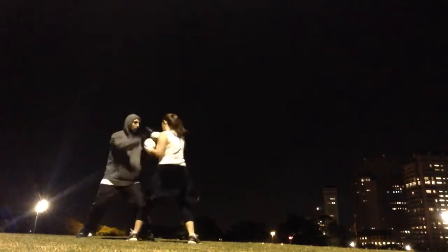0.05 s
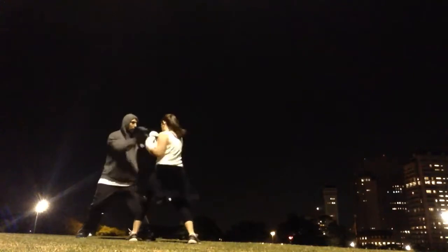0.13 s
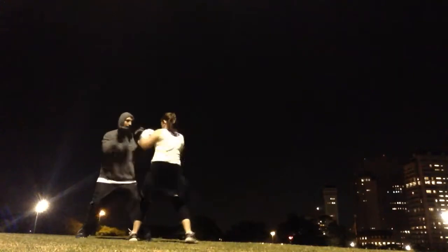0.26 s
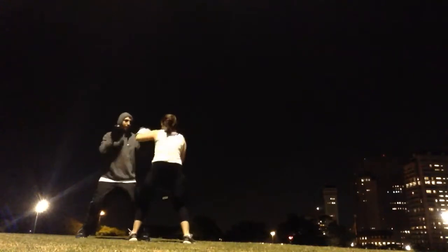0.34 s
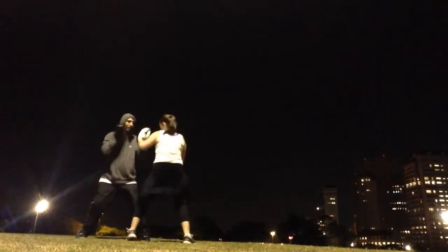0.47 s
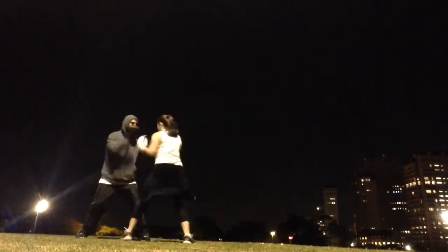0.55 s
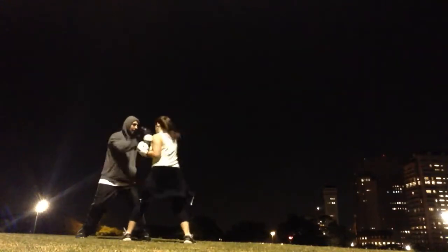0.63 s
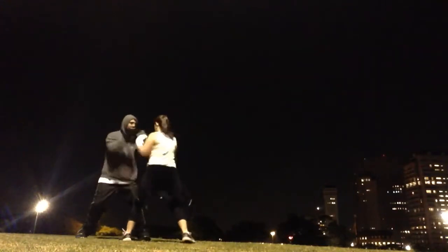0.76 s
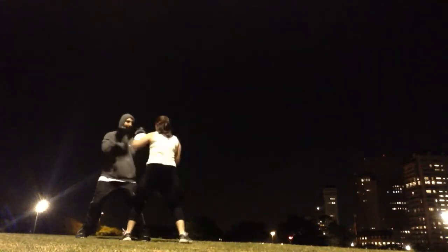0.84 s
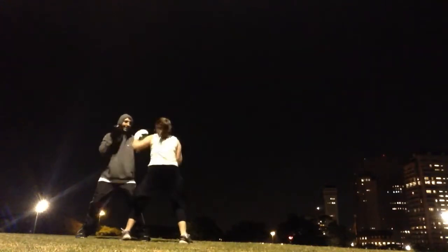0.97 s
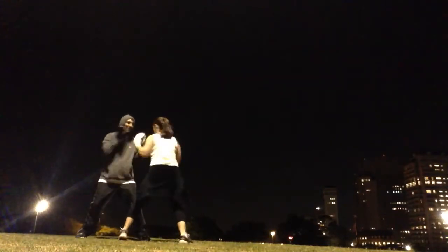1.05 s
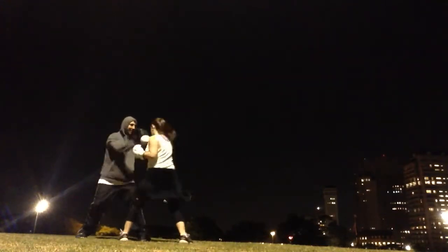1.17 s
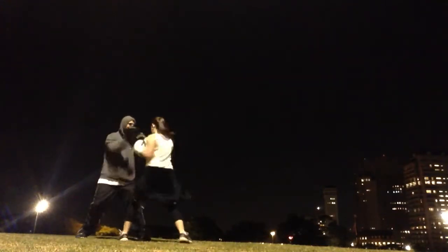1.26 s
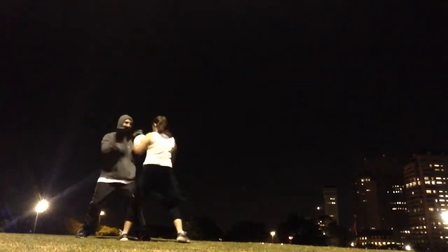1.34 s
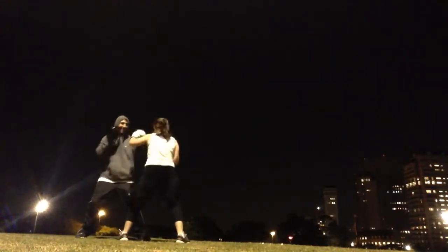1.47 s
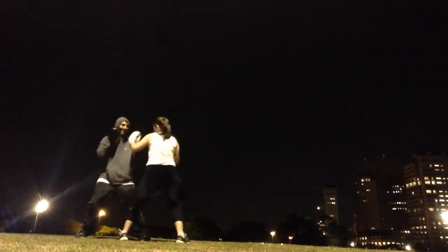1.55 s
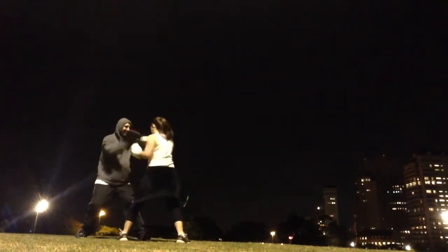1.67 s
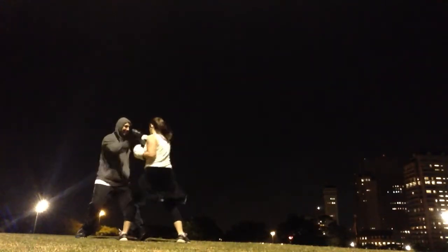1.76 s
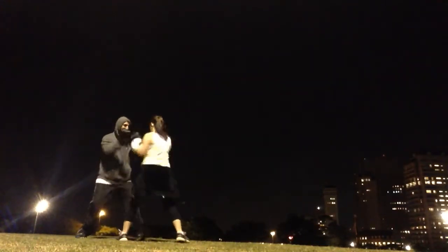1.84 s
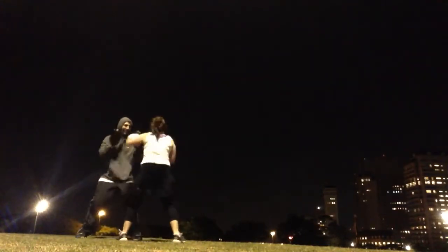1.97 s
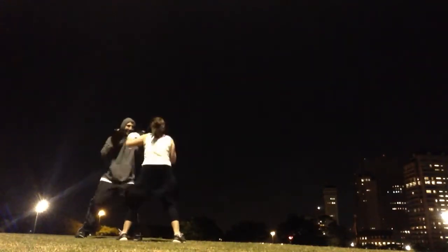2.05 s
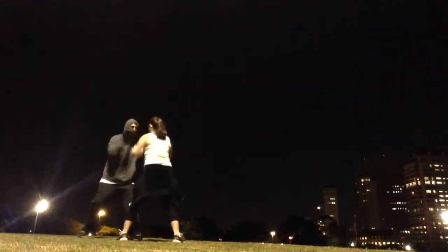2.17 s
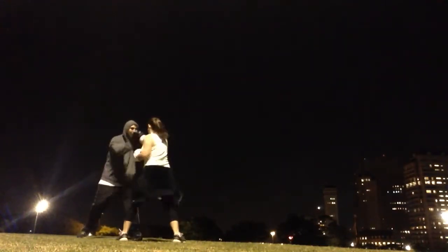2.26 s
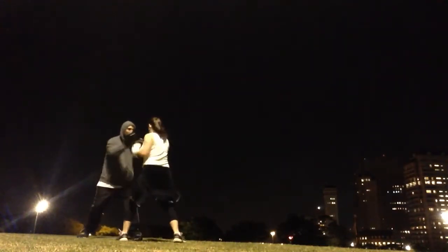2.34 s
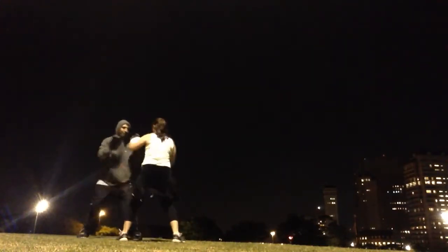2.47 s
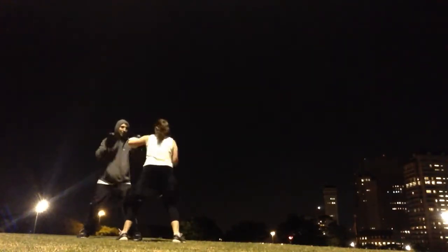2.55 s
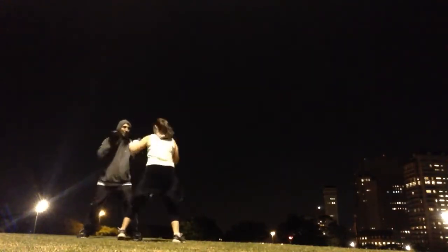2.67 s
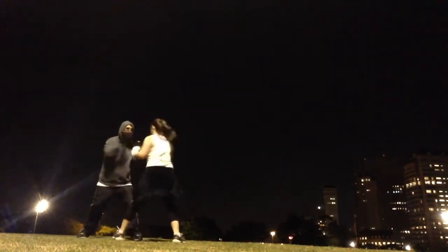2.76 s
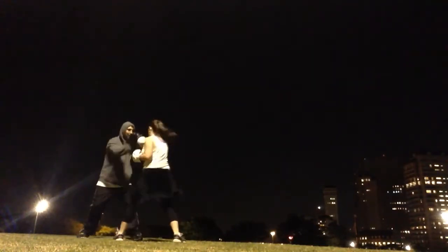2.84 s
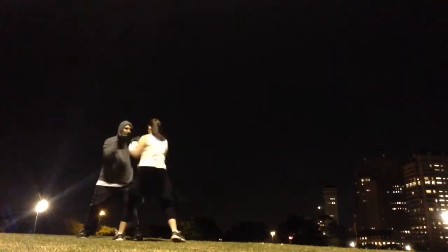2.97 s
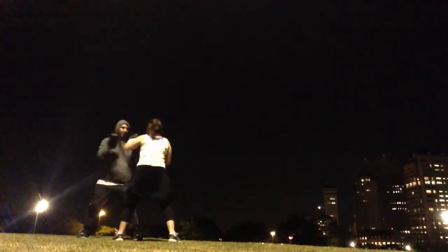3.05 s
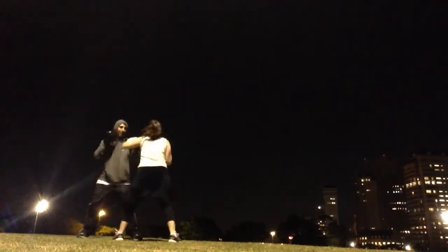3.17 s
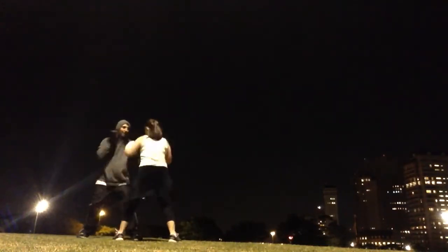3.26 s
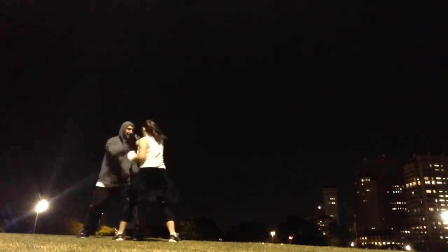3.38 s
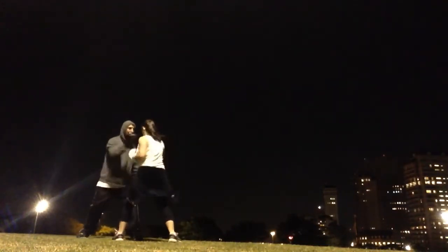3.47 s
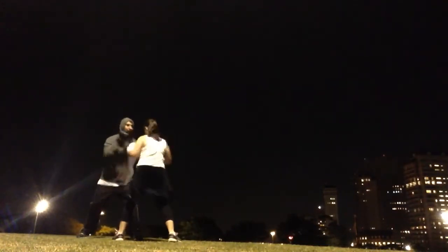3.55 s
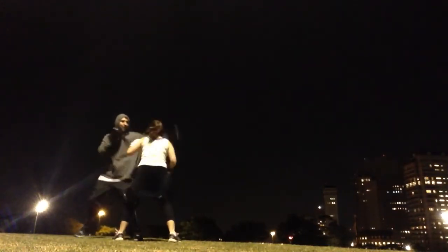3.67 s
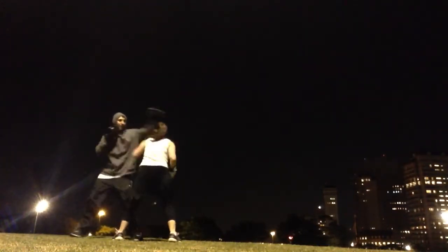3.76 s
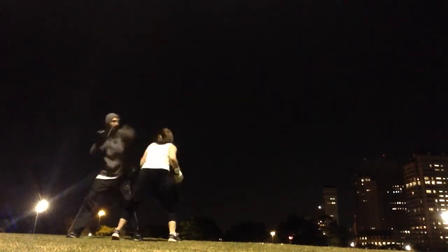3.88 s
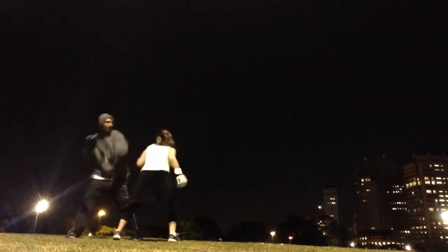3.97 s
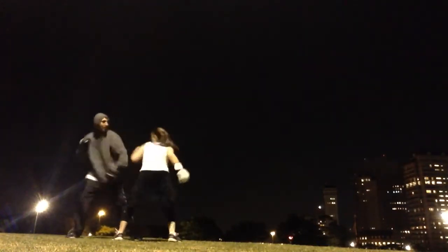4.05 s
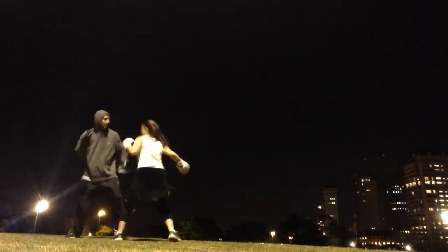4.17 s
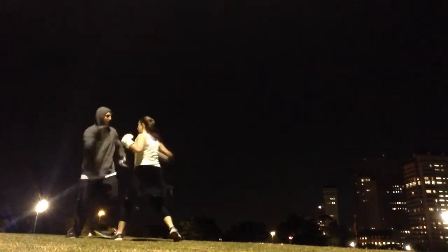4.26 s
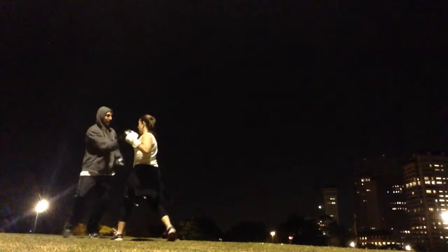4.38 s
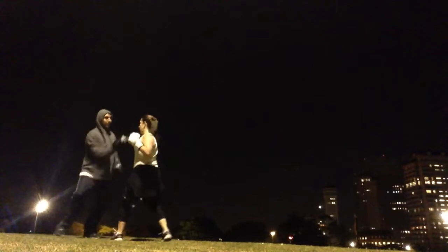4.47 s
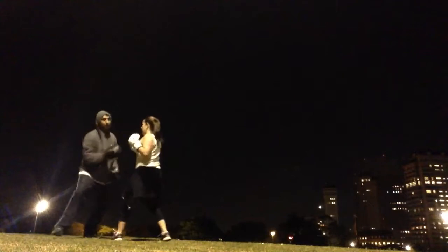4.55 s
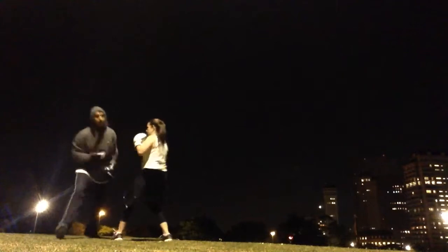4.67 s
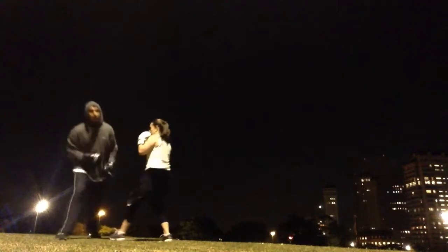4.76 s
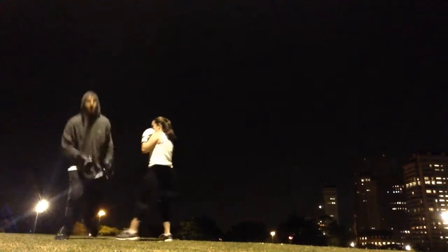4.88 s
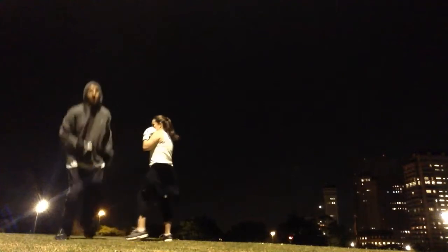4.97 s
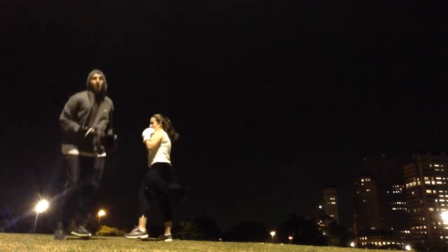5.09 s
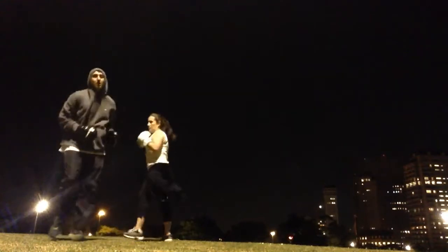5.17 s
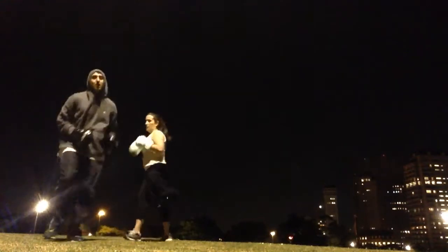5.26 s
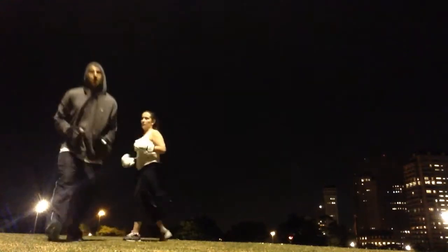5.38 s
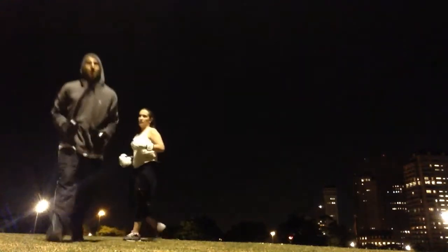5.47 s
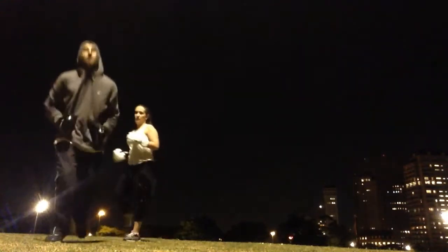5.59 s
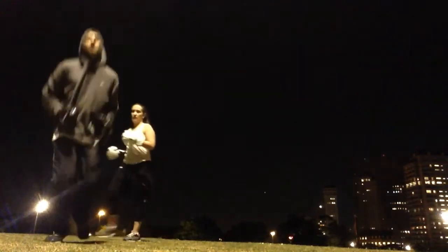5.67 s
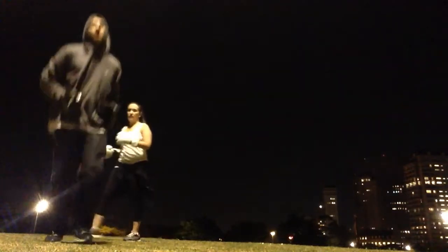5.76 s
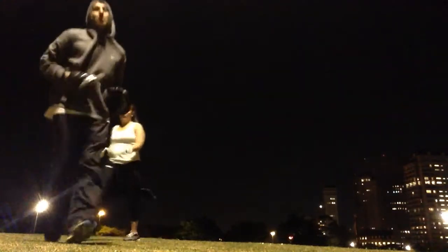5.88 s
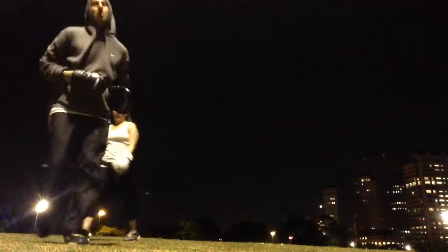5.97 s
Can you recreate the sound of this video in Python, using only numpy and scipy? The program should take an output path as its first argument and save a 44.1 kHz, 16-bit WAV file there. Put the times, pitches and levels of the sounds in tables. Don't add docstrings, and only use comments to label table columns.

```python
import sys
import numpy as np
from scipy import signal
from scipy.fft import rfft, irfft, next_fast_len
from scipy.io import wavfile
from scipy.ndimage import map_coordinates

SR = 44100
rng = np.random.default_rng(int(sys.argv[2]) if len(sys.argv) > 2 else 0)


def attenuation_scalar(level_db):
    decades = np.asarray(level_db, float) / 20
    return 10 ** decades


def bounce(signal):
    frames = np.transpose(np.atleast_2d(signal))
    limited = np.clip(frames, -1, 1)
    pcm = np.round(limited * 32767).astype(np.int16)
    wavfile.write(sys.argv[1], SR, pcm)


N = 265651


def unit(x):
    return x / np.sqrt(np.mean(x ** 2) + 1e-20)


def curve(rows, outside=None):
    start_s, value = np.transpose(rows)
    return np.interp(np.arange(N) / SR, start_s, value, outside, outside)


def wander(size, spacing):
    points = rng.standard_normal(int(size / spacing) + 4)
    return map_coordinates(points, [np.arange(size) / spacing])


def wobble(rate_hz):
    return wander(N, SR / rate_hz)


def noise(spectrum, size=N):
    length = next_fast_len(size)
    pitch_hz, level_db = np.transpose(spectrum)
    hz = np.fft.rfftfreq(length, 1 / SR)
    shape_db = np.interp(np.log(hz + 1), np.log(pitch_hz), level_db, -120, -120)
    hiss = irfft(rfft(rng.standard_normal(length)) * attenuation_scalar(shape_db), length)
    return unit(hiss)[:size]


def add(track, start_s, sound):
    track[round(start_s * SR):][:len(sound)] += sound


# start_s, level_db
TRAFFIC = [(0.0, -64), (0.28, -63), (1.79, -66), (2.78, -63), (3.17, -70.5), (3.67, -67), (4.41, -66.5),
           (4.61, -65.5), (5.16, -66), (5.48, -62.5), (5.67, -64.5), (6.02, -64.5)]
# pitch_hz, level_db (per Hz)
RUMBLE = [(13, -54), (22, -23.5), (36, -12.5), (59, 3.5), (130, -2.5), (208, -9), (349, -19.5), (381, -20),
          (420, -25), (550, -50), (920, -120)]
# pitch_hz, level_db (per Hz)
ROAR = [(180, -33.5), (300, -2.5), (348, -1), (384, -14), (424, -4.5), (460, -7.5), (947, -13.5),
        (2800, -29), (5670, -32.5), (15200, -45)]


def city():
    traffic_db = curve(TRAFFIC)
    usual_db = traffic_db.mean()
    rumble_db = usual_db + 19.5 + 0.6 * (traffic_db - usual_db)
    rumble = attenuation_scalar(rumble_db + 1.2 * wobble(4.7)) * noise(RUMBLE)
    roar_db = traffic_db + 3 + 0.96 * wobble(6.1) + 0.7 * wobble(40)
    roar = attenuation_scalar(roar_db) * noise(ROAR[:8] + [(5000, -49.5)])
    hiss = attenuation_scalar(traffic_db - 14 + 2.2 * wobble(7.5)) * noise([(1800, -45)] + ROAR[7:])
    return rumble + roar + hiss


# start_s, level_db
CLOTH = [
    (0, -78),
    (.9, -79),
    (2.1, -86.5),
    (2.4, -79),
    (3.3, -86.5),
    (4.42, -79),
]
# pitch_hz, level_db (per Hz)
RUSTLE = [(3000, -34.5), (6000, -7), (9000, -3), (13000, -0.5), (15000, -9), (15600, -34.5)]


def clothing():
    t = np.arange(N) / SR
    cloth_db = curve(CLOTH, -120)
    for hit_s, *_ in PUNCH:
        cloth_db = cloth_db + 7.5 * (t < hit_s) * np.exp(np.minimum(t - hit_s, 0) / 0.06)
    return attenuation_scalar(cloth_db - 6.5 + 1.4 * wobble(60) + 2.5 * wobble(8.1)) * noise(RUSTLE)


# start_s, level_db (peak)
TICKS = [(0.5418, -70), (0.289, -57), (0.3034, -63), (0.489, -58), (0.818, -69), (0.824, -49),
         (0.8364, -65), (1.3839, -61), (1.4202, -67), (1.8138, -48.5), (1.924, -69.5), (2.426, -68),
         (2.462, -62), (2.4676, -57), (2.4988, -65), (2.7655, -61), (2.7731, -62), (2.984, -66),
         (3.006, -69), (3.355, -69.5), (3.495, -62), (3.5691, -69.5), (4.0604, -66.5), (4.873, -61),
         (4.9964, -60), (5.372, -65), (5.446, -65), (5.4822, -64), (5.5794, -58), (5.7808, -64.5)]
PEEL_S = 0.035


def ticks():
    track, t = np.zeros(N + SR), np.arange(1024) / SR
    snaps = [(start_s, level_db, 10800) for start_s, level_db in TICKS]
    for hit_s, *_ in PUNCH:
        touch_luck, peel_delay, peel_luck = rng.standard_normal(3)
        snaps.append((hit_s - 0.0125, -63 + 4 * touch_luck, 4800))
        snaps.append((hit_s + PEEL_S + 0.002 * peel_delay, -59 + 3 * peel_luck, 5600))
    u = t / 0.00072
    envelope = u * np.exp(1 - u * 2.3)
    for start_s, level_db, hz in snaps:
        band = [(hz / 3, -30), (hz / 1.5, -6), (hz, 0), (hz * 1.45, -5), (hz * 2.1, -16), (60000, -30)]
        add(track, start_s, attenuation_scalar(level_db + 7.5) * noise(band, size=len(t)) * envelope)
    return track[:N]


LEAD_S = 0.02
T = np.arange(SR // 8) / SR - LEAD_S
AFTER, BEFORE, HIT = np.maximum(T, 0), np.minimum(T, 0), T >= 0


def dying(t60_s):
    return HIT * attenuation_scalar(-60 * AFTER / t60_s)


def tone(hz, phase=0.0):
    return np.sin(2 * np.pi * hz * AFTER + phase)


# pitch_hz, level_db, t60_s
FOAM = [
    (84.4, -5.5, .05),
    (171.9, -2.5, 0.024),
]


def thump(pad_hz, pad_db, skin_hz, skin_db):
    squeeze = -0.7 * np.exp(BEFORE / 0.00055 - AFTER / 0.00033)
    (sway_hz, sway_db, sway_t60), (dent_hz, dent_db, dent_t60) = FOAM
    sway = attenuation_scalar(sway_db) * tone(sway_hz, 1.0) * dying(sway_t60) * (1 - np.exp(-AFTER / 0.002))
    dent = 1.4 * attenuation_scalar(dent_db) * tone(dent_hz) * dying(dent_t60)
    ring = -attenuation_scalar(pad_db) * tone(pad_hz, 1.5) * dying(0.023) * (1 - np.exp(-AFTER / 0.00028))
    buzz = attenuation_scalar(skin_db) * tone(skin_hz) * dying(0.011)
    return squeeze + sway + dent + ring + buzz


def slap(slap_hz, cycles):
    turns = slap_hz * AFTER
    return -1.7 * tone(slap_hz) * np.exp(-turns / cycles) * (1 - np.exp(-turns / 0.22))


# pitch_hz, level_db (per Hz)
LEATHER = [(400, -18.5), (1200, 4.5), (3000, -2.5), (6000, -2), (8500, -10), (13000, -15), (16000, -28.5)]
# pitch_hz, level_db (per Hz)
PEELING = [(1500, -22), (3500, -2), (5500, 0), (8000, -7.5), (12000, -11), (15500, -22)]


def scatter(leather_db, peel_db):
    lead_in = attenuation_scalar(-24.5) * ~HIT * np.exp(BEFORE / 0.004)
    fade = dying(0.018) + attenuation_scalar(-29.5) * dying(0.21) + lead_in
    rub = attenuation_scalar(leather_db) * noise(LEATHER, size=len(T)) * fade
    peel_width_s = np.where(T < PEEL_S, 0.008, 0.013)
    peel_swell = np.exp(-np.abs((T - PEEL_S) / peel_width_s) ** 1.2)
    peel = attenuation_scalar(peel_db + 2.5 * rng.standard_normal()) * peel_swell * noise(PEELING, size=len(T))
    bursts = attenuation_scalar(3.5 * wander(len(T), 24))
    return bursts * (rub + peel)


# start_s, slap_db (peak), slap_hz, thump_db, pad_db (pad ring over the thump)
PUNCH = [(0.1421, -11.5, 3830, -15.5, -10.5), (0.4065, -5, 3460, -14, -3), (.6872, -2, 5040, -15, -13),
         (0.9607, -6.5, 3500, -14.5, -15), (1.234, -0.5, 5380, -16.5, -17),
         (1.5016, -2.5, 4320, -16, -11.5), (1.7827, -2, 4650, -17, -32), (2.0552, -7, 3800, -16.5, -3.5),
         (2.3141, -10, 6370, -17, -8), (2.6016, -11, 3660, -17, -1), (2.9013, -0.5, 4800, -20, -15),
         (3.1702, -14.5, 4900, -19.5, -2), (3.4602, -6, 4680, -19.5, -5.5), (4.4409, -2.5, 5570, -14, 2.1)]
# pad_hz, skin_hz, skin_db, slap_cycles, sheen_db, peel_db
MITTS = [
    (380, 1370, -12.5, 0.69, -25.5, -64),
    (458, 720, -1.5, 0.61, -32, -72),
]
# pitch_hz, level_db (per Hz)
GLOSS = [(6000, -32), (10000, -16), (12800, .0), (14500, -1.5), (16000, -22)]


def punches():
    track = np.zeros(N + SR)
    for k, (start_s, slap_db, slap_hz, thump_db, pad_db) in enumerate(PUNCH):
        pad_hz, skin_hz, skin_db, cycles, sheen_db, peel_db = MITTS[k % 2]
        pad_hz, skin_hz = np.array([pad_hz, skin_hz]) * (1 + 0.054 * rng.standard_normal(2))
        blow = attenuation_scalar(thump_db) * thump(pad_hz, pad_db, skin_hz, skin_db)
        blow += attenuation_scalar(slap_db) * slap(slap_hz, cycles)
        blow += attenuation_scalar(sheen_db) * noise(GLOSS, size=len(T)) * dying(0.0032)
        blow += scatter(thump_db - 11.5, peel_db)
        add(track, start_s - LEAD_S, blow)
    return track[:N]


# start_s,
# level_db (peak), pitch_hz, width_octaves, length_s
SCUFFS = [(0.147, -39.5, 11400, 0.36, 0.0006), (.581, -73.5, 12500, .41, .03),
          (1.347, -70.5, 11000, .6, 0.013), (2.436, -71.5, 12500, .41, 0.017),
          (3.075, -80.5, 9000, 0.68, 0.023), (4.001, -76.5, 6500, .6, 0.023),
          (4.351, -79, 10000, 0.67, 0.021), (4.4415, -27, 678, .25, .002),
          (4.4421, -20, 5740, 0.25, 0.0007), (4.506, -63, 2530, 0.14, 0.012),
          (4.512, -66, 1900, 0.3, 0.012), (4.533, -73, 5600, 0.11, 0.015), (5.774, -66, 6900, 0.15, 0.013),
          (5.959, -64.5, 2000, 0.64, 0.018), (6.001, -51, 555.6, 0.9, 0.007)]


def scuffs():
    track, t = np.zeros(N + SR), np.arange(SR // 8) / SR
    for start_s, level_db, hz, width, length_s in SCUFFS:
        near, far = 2 ** width, 2 ** (3 * width)
        band = [(hz / far, -25), (hz / near, -6), (hz, 0), (hz * near, -6), (hz * far, -25)]
        envelope = (t / length_s * np.exp(1 - t / length_s)) ** 2
        add(track, start_s, attenuation_scalar(level_db) * noise(band, size=len(t)) * envelope)
    return track[:N]


# start_s, level_db (peak), pitch_hz
STEPS = [
    (2.441, -29, 190),
    (2.735, -27.5, 206),
    (3.221, -35.5, 200),
    (4.476, -24, 191),
    (5.275, -33, 163),
    (1.696, -42.5, 199),
    (2.989, -34.5, 259),
]


def footsteps():
    track, t = np.zeros(N + SR), np.arange(SR // 8) / SR
    for start_s, level_db, hz in STEPS:
        thud = np.sin(2 * np.pi * hz * t) * t / 0.0056 * np.exp(1 - t / 0.0028)
        add(track, start_s, attenuation_scalar(level_db) * thud)
    return track[:N]


# start_s (loudest moment), level_db, sweep_s
STRIDES = [
    (4.525, -61, 0.024),
    (4.69, -72, 0.14),
    (4.95, -80.5, .12),
    (5.194, -74, .04),
    (5.47, -68, 0.16),
    (5.594, -75, 0.018),
    (5.784, -68, 0.033),
    (5.95, -74.5, 0.1),
]
# pitch_hz, level_db (per Hz)
BLADES = [(700, -16), (2000, 1), (4000, -1.5), (7500, -2.5), (11000, -2.5), (15000, -4), (15600, -37)]


def grass():
    t = np.arange(N) / SR
    walk_s = CLOTH[-1][0]
    loudness = attenuation_scalar(-73.5 + 2.5 * (t - walk_s)) * (t > walk_s)
    for start_s, level_db, sweep_s in STRIDES:
        width_s = sweep_s * np.where(t < start_s, 0.6, 1.3)
        loudness += attenuation_scalar(level_db) * np.exp(-np.abs((t - start_s) / width_s) ** 1.5)
    dull = noise(BLADES[:4] + [(11000, -45)])
    bright = noise([(4500, -31)] + BLADES[3:])
    crackle = attenuation_scalar(1.2 * wobble(50) + 1.2 * wobble(260))
    return loudness * attenuation_scalar(-9) * (attenuation_scalar(1) * dull + attenuation_scalar(-1) * bright) * crackle


def scene():
    background = city() + clothing() + grass()
    return (background + ticks() + punches() + scuffs() + footsteps())[None]


def low_pass(x):
    return signal.sosfilt(signal.butter(12, 16530, fs=SR, output="sos"), x)


def record(dry):
    hz = np.fft.rfftfreq(N, 1 / SR)
    bass = hz ** 2 / np.sqrt(hz ** 4 + 38 ** 4)
    top = np.interp(hz, [15100, 15500, 16400, 16600], attenuation_scalar([0, -20, -24, -70]))
    return low_pass(irfft(rfft(dry) * bass * top, N))


dry = scene()
out = record(dry)
bounce(out)
```